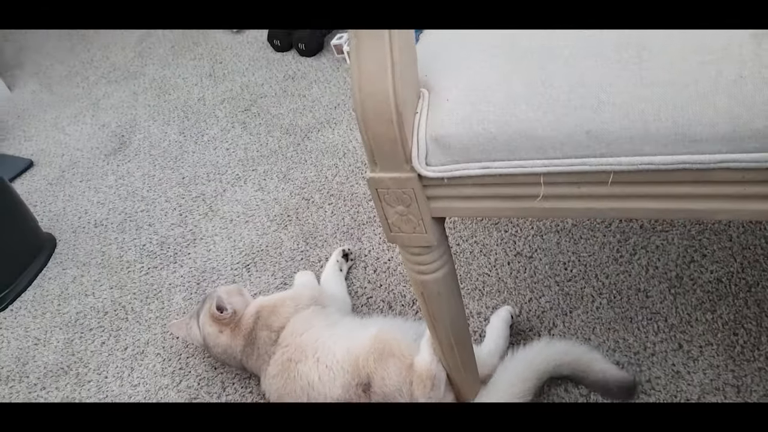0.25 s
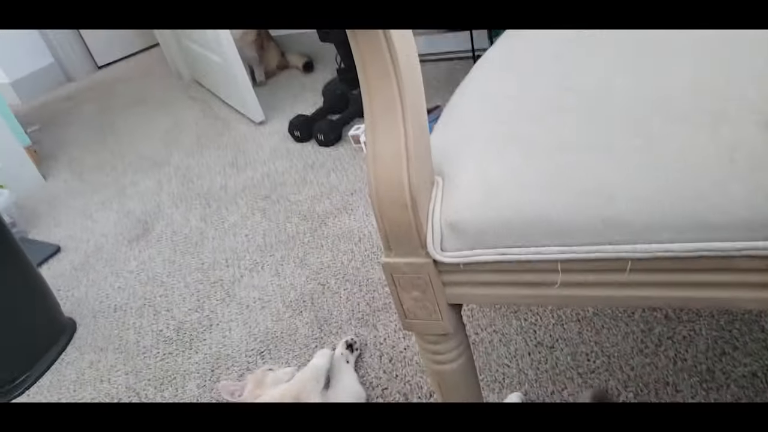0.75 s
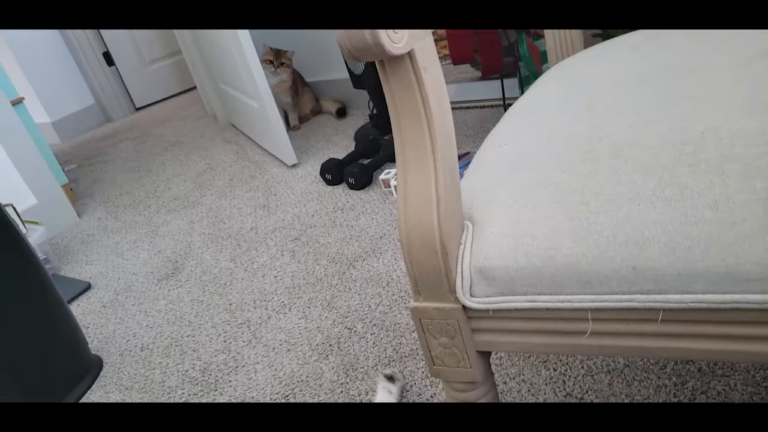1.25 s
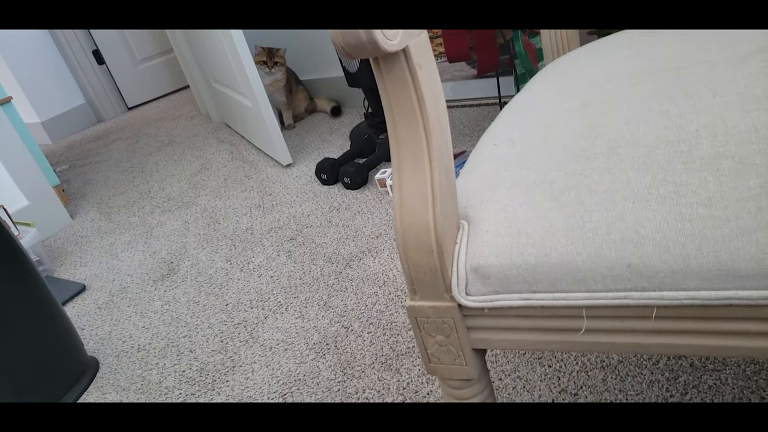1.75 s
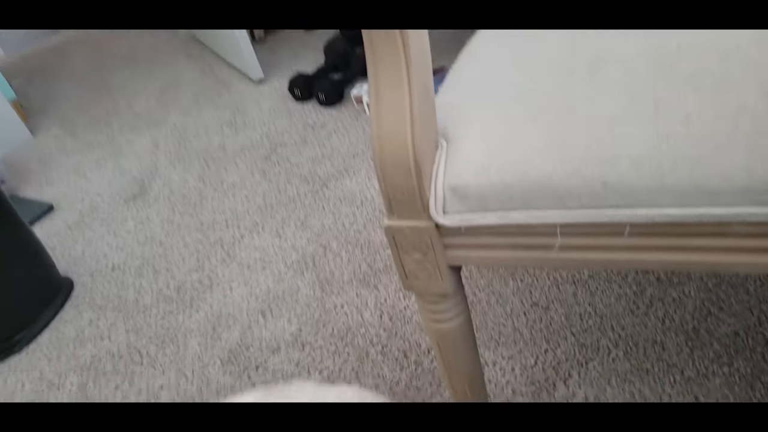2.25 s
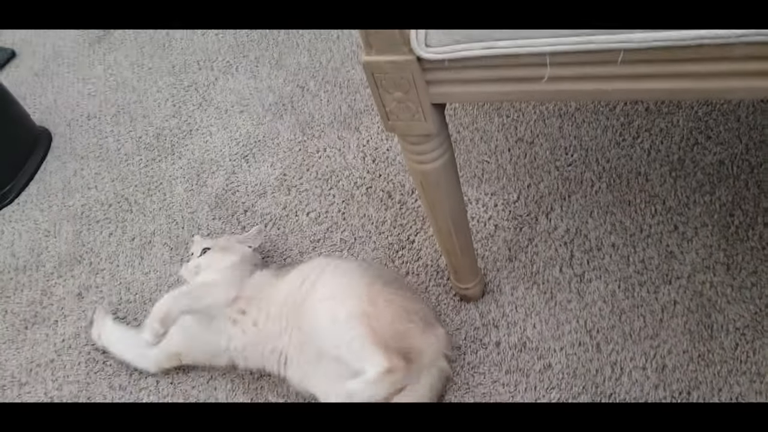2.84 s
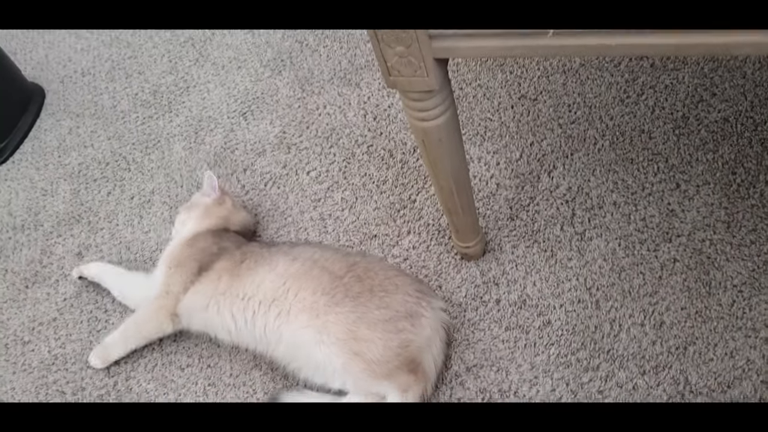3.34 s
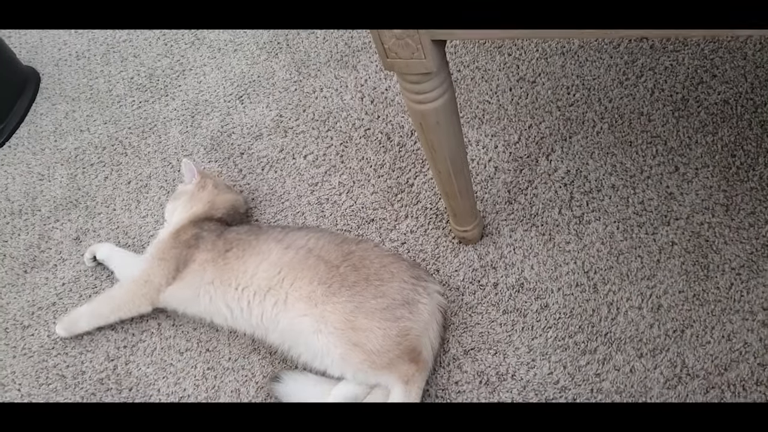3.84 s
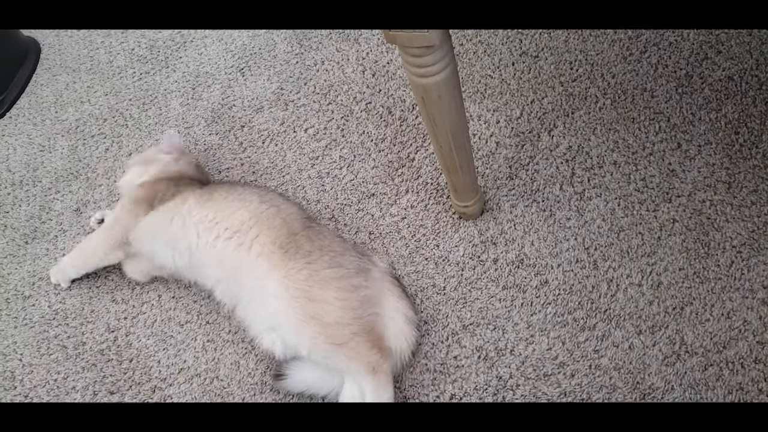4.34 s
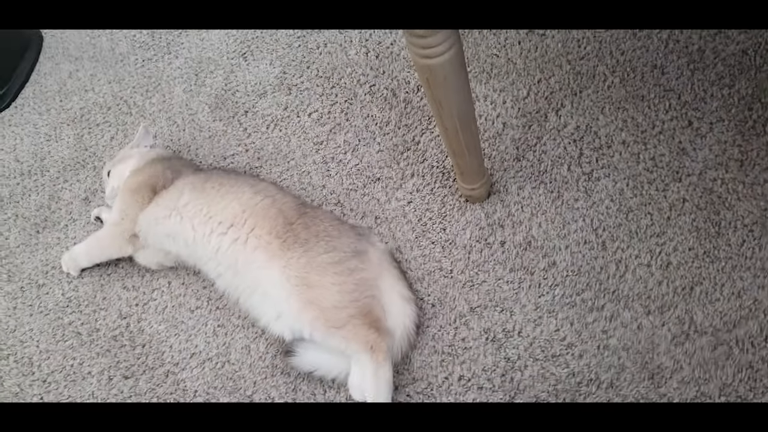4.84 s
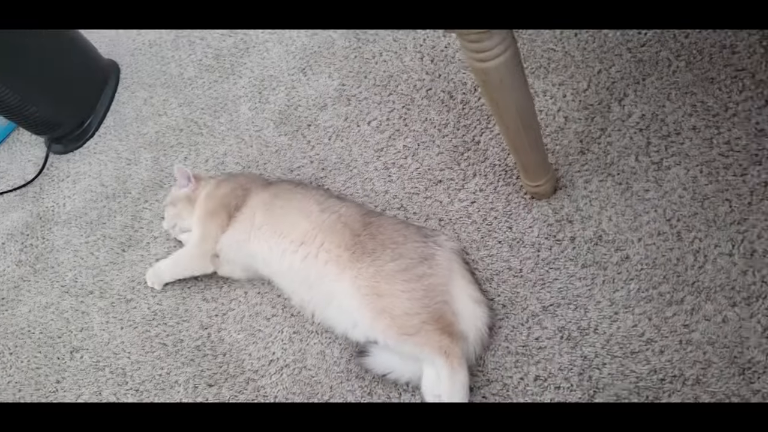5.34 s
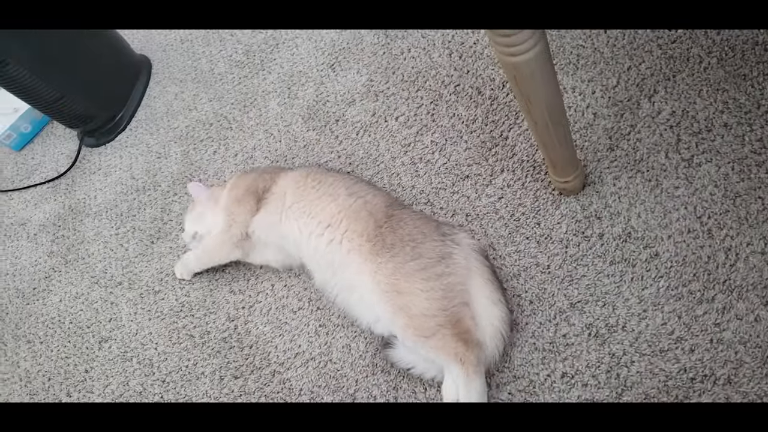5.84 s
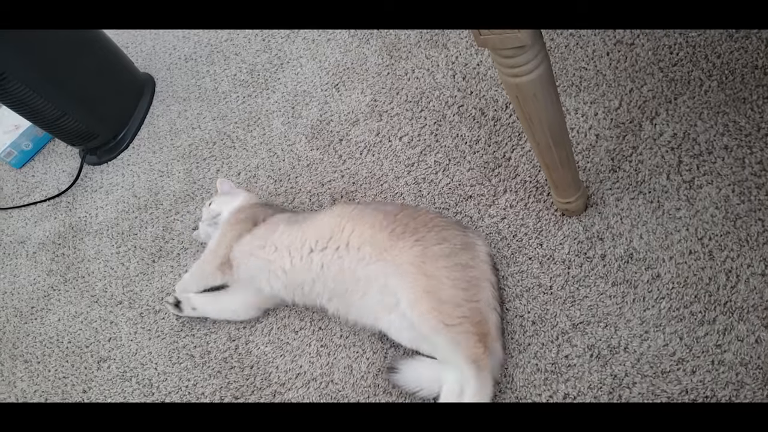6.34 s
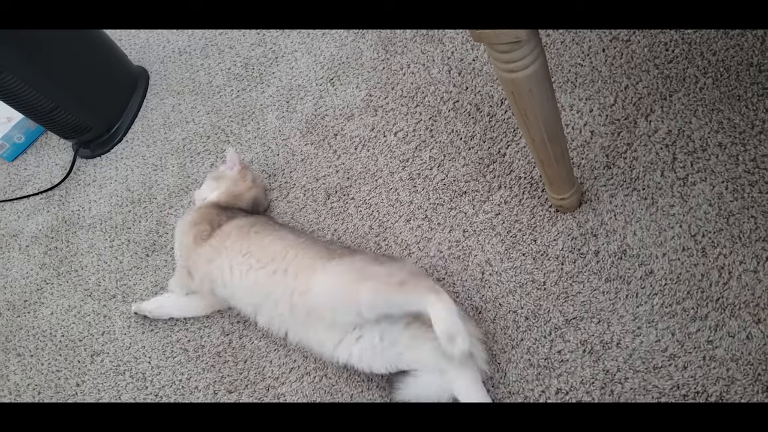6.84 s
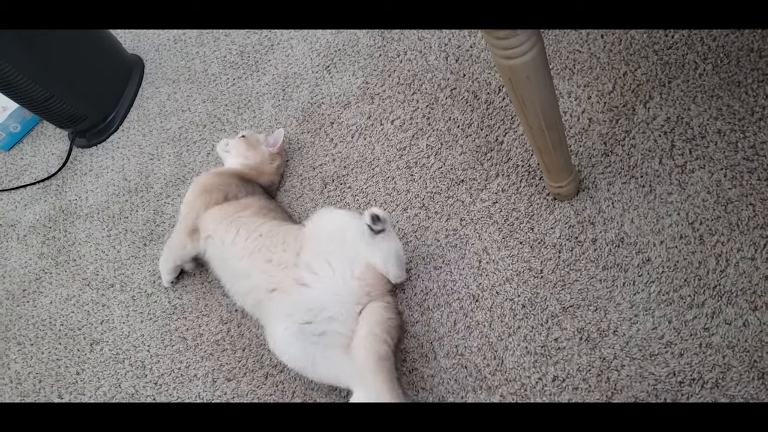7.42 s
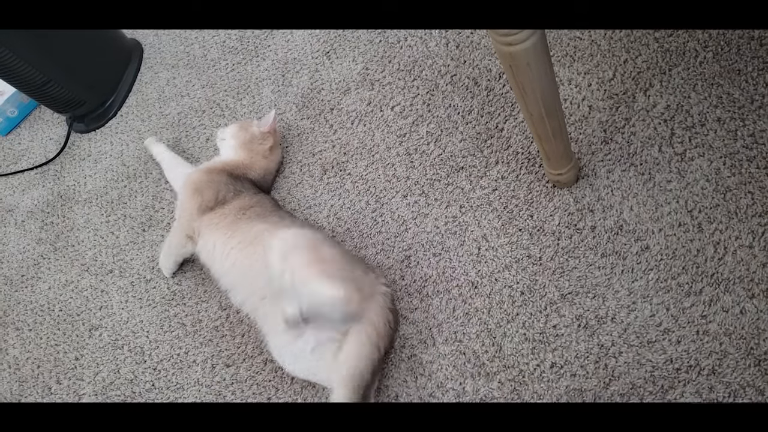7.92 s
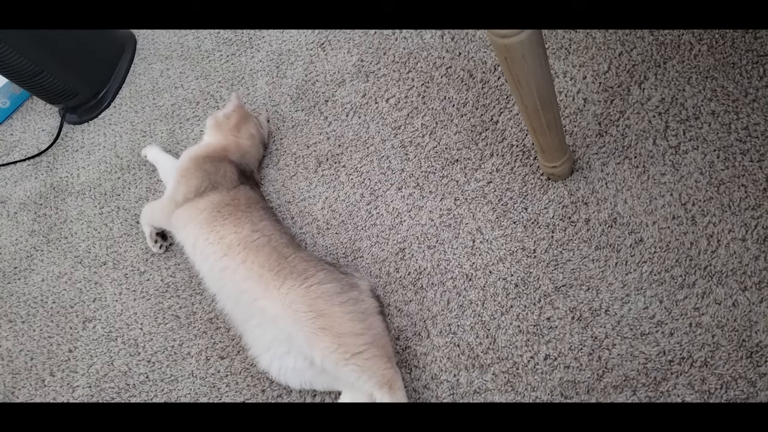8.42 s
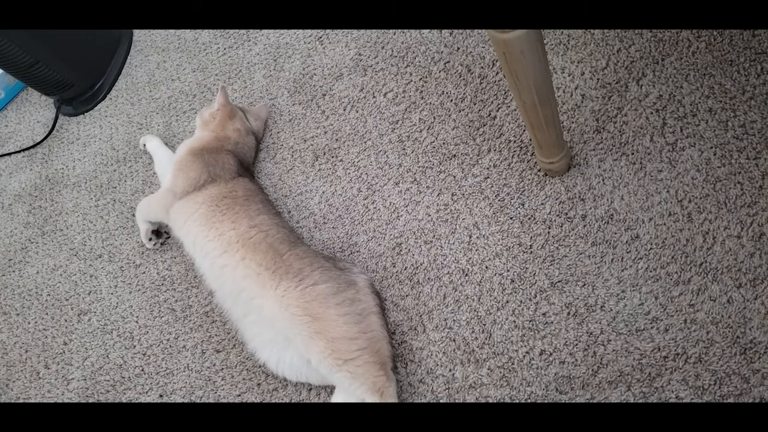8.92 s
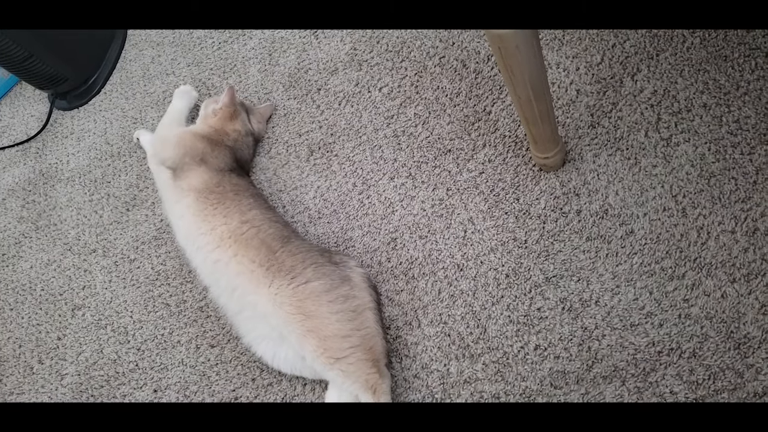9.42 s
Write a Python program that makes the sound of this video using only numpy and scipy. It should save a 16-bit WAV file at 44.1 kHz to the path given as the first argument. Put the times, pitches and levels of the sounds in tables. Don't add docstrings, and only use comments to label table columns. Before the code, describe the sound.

From 0 to 1.1 seconds, fingers shift on a hand-held stereo recorder: dense, very close hollow knocks, loudest around 0.2 to 0.35, with crisp ticks, short scrapes and low rumble. From 1.2 to 1.6 a cat gives faint, low closed-mouth coos amid light taps. Softer coos follow near 2.0 to 2.3, with more bumps. Between 2.5 and 2.85 handling thickens again, knocks and dry rubbing with a quick stuttering slip, overlapping a soft mew that rises until 3.05, then drops and fades by 3.3. Quiet, small pats and a tiny coo at 3.6. Brief nasal chirps at 4.2 lead to a hoarse fluttering trill from 4.5 to 5.1, with taps near its end. Faint pats and rubs come around 6.0 and 6.7, two firmer knocks around 7.5, light ticks until 8.2. Then low hum and gentle hiss, with one barely audible coo at 9.1. Close, slightly left-leaning, dry, small room.

```python
import sys
import numpy as np
from scipy import signal
from scipy.fft import rfft, irfft, next_fast_len
from scipy.io import wavfile
from scipy.ndimage import uniform_filter1d

SR = 44100
rng = np.random.default_rng(int(sys.argv[2]) if len(sys.argv) > 2 else 0)


def convert_level_to_amplitude(level_db):
    exponent = np.asarray(level_db, float) / 20
    return 10 ** exponent


def wrap_up_sound(samples):
    columns = np.atleast_2d(samples).T
    tamed = np.clip(columns, -1, 1)
    steps = np.round(tamed * 32767).astype(np.int16)
    wavfile.write(sys.argv[1], SR, steps)


N = 426888

# start_s, knock_db, tick_over_knock_db, sway_over_knock_db
FIRM_KNOCKS = [(0.017, -10.5, -17, -3), (0.0304, -7, -16.5, -16.5), (0.1915, -2.5, -9, -7),
               (0.2926, -2.5, -4, -4.5), (0.3075, -4.5, -5, -5.5), (0.3266, -3.5, -2, -11),
               (0.6086, -17, -2.5, 3.5), (0.664, -9.5, -1.5, 2.5), (0.7034, -6.5, -5.5, -36),
               (0.719, -12, -14, 1.5), (0.7544, -8, -2.5, 1), (0.9565, -11.5, 7.5, 2),
               (1.007, -19.5, -6, 10), (1.0743, -13.5, -8, 2.5), (2.152, -21.5, -6.5, 3),
               (2.1637, -24.5, -22, 18.5), (2.3142, -18.5, -12.5, -1.5), (2.3533, -15.5, -18, -7),
               (2.6301, -13.5, -7.5, -14), (2.6376, -20.5, -12, -4), (2.7896, -14.5, -19.5, -34),
               (2.8138, -10, -18.5, -36), (2.8268, -8.5, -17.5, -11.5), (4.72, -24, 6, -15),
               (4.8513, -19.5, -10.5, -5), (4.8855, -15, -6.5, 1.5), (5.025, -20, -2, -3),
               (6.6914, -17, -15.5, -11.5), (7.4572, -9.5, -5, -12.5), (7.538, -14.5, -13.5, -8.5)]
# start_s, tick_db
NAIL_TAPS = [(.128, -31.5), (.283, -28), (0.708, -28), (0.7992, -34), (0.851, -46), (4.848, -35),
             (1.111, -30), (1.1338, -36), (1.4942, -36.5), (1.5102, -36.5), (1.8797, -38.5), (2.1251, -29),
             (2.1866, -28), (0.976, -37), (2.5566, -33), (3.839, -50), (4.762, -38), (4.963, -44),
             (4.997, -38), (5.003, -27), (5.0911, -38), (6.1295, -37.5), (7.1431, -45), (7.158, -55),
             (7.487, -37), (7.74, -39.5), (7.9247, -45.5)]
# start_s, knock_db, knock_hz, sway_over_knock_db
FINGER_PATS = [(0.116, -30, 346, 1), (0.9825, -24.5, 310, 12), (1.094, -19.5, 253, -13),
               (1.125, -22.5, 330, 5), (1.486, -31.5, 220, 7), (2.17, -17.5, 158, 2.5),
               (2.261, -24.5, 322, -4), (2.269, -27, 323, 9), (2.349, -23, 390, -18), (2.4567, -31, 375, 5),
               (2.5277, -44, 520, 15), (2.5801, -21.5, 250, -2), (2.594, -28, 346, -8),
               (2.689, -27, 370, 1), (2.737, -27, 337, -4), (2.749, -31, 334, -14), (2.8024, -15, 575, -14),
               (3.079, -27.5, 480, -4), (3.4085, -21.5, 554, -17), (3.608, -31.5, 330, -1.5),
               (3.853, -45, 294, 10.5), (4.893, -20, 222, -8.5), (4.984, -17, 583, -11),
               (5.991, -34, 487, -9), (6.1, -34, 420, -6), (6.159, -41.5, 197, 6), (6.935, -47, 340, 2.5),
               (7.924, -35, 374, -10), (8.1974, -49.5, 494, -4), (6.107, -34.5, 170, 4),
               (6.129, -37, 270, -3), (.872, -37, 300, 3), (2.926, -41, 300, -5), (6.689, -28.5, 407, -10)]
# first_s, last_s, slips_per_s, knock_db
STICK_SLIPS = [
    (2.6447, 2.671, 160, -20.5),
    (3.619, 3.676, 113, -38),
    (6.018, 6.046, 45, -36),
]
# from_s, knock_hz, tick_hz, upper_mode_db, left_right_db
GRIPS = [(0, 428, 3050, -2, 8), (.1, 381.8, 3240, -11, 10.5), (.17, 412, 3360, -7, 7),
         (.25, 591, 3300, -4, 10), (.5, 297, 2180, -15, 4.5), (.65, 340, 2210, -32, 4),
         (.706, 457, 2290, 2, 5.5), (.73, 330, 2360, -31, 5.5), (.93, 349, 2350, -22, 1.5),
         (1.05, 332, 2420, -28, 3), (1.4, 294, 2600, -7, 8), (1.8, 294, 1480, -5, 0.5),
         (2.1, 420, 2500, -12, 5.5), (2.14, 402, 2400, -2, -0.5), (2.18, 393, 2390, -10.5, 14),
         (2.25, 387, 2090, -22, 7), (2.33, 426, 2740, -1.5, 4), (2.4, 430, 2370, -5, -16),
         (2.55, 414, 2320, -17, 11.5), (2.6, 476, 3250, -9.5, 13), (2.72, 342, 3240, -13, -14),
         (2.77, 507, 3020, 1.5, 3.5), (2.82, 530, 2920, -2, -1), (3, 576, 1936, -8, 13.5),
         (3.5, 570, 2010, -21.5, -14), (4.6, 572, 2570, -8, 12.5), (4.8, 445, 2040, -12, 13),
         (4.87, 478, 3000, -11, 6), (4.95, 469, 2210, -11, 11.5), (5.015, 463, 2690, -10, 12.5),
         (5.9, 398, 2030, -15.5, 5), (6.12, 335, 4480, -13.5, 5.5), (6.5, 435, 1920, -30, 11),
         (7.3, 408, 2010, -13.5, 11.5), (7.5, 386, 1950, -14, 14), (7.7, 383, 1287, -26, 10)]
# lower_mode_db, shrill_mode_db, tick_ms, tick_left_right_db, overtone_left_right_db
GRIP_TINTS = [(7, -2, 1.35, 6, -13), (4.5, -17, 0.65, 4.5, 13), (-1, -9, 1.4, 7, -8),
              (-2, -22.5, 1, 8.5, 3.5), (-17, -19, 1.2, 0, -7), (-8, -41, 1.17, -1, -11),
              (0, -14, 1.5, 8.5, -5), (5.5, -38, 1.2, 3.5, -19), (-10, -36, 0.96, 0.5, -8),
              (-5, -36, 1.35, 3, -5), (-13, -9, 0.77, 9, -2), (0, -28, 1.2, 11, -3), (2, -18, 2.1, 1, 7),
              (2, -10, 1.4, -1, -3), (-17, -27, 1.4, 10, -6), (-3, -30, 1.5, 1, -14), (-4, 2, 0.7, 8.5, 2),
              (-2, -12, 1.1, -13, 12), (-10, -28, 1, -7, -3), (-25, -14, 0.74, 18.5, 2.5),
              (-8, -25, 0.69, -6, -3), (-7, 3, 0.88, 8, 5), (-3, -6, 1.4, 6.5, 2),
              (-3.5, -25, 0.55, 8, -7.5), (-8, -30, 1.8, -12, -9.5), (-14, -6, 1.4, 9, 7),
              (-7, -18, 1.1, 8, -12), (0, -9, 0.96, 11.5, 8), (-12, -15, 0.98, 13, 3),
              (-1, -26, 0.62, 8, -18), (0.5, -25.5, 1.3, 8, -1), (-10.5, -25, 0.77, 14, -4),
              (-2.5, -33, 1.47, 11.5, -10), (-24.5, -34.5, 1.62, 7, -10), (-12, -34, 1.8, 20, -14),
              (-5, -31, 1.14, 6, 8)]
# from_s, direction, case_hz, case_over_knock_db, second_mode_db
PUSHES = [(0, 1, 208, -0.5, -4), (.17, 1, 240, -1.5, -8), (.25, 1, 191.7, 1, -15), (.5, -1, 271, -0.5, -14),
          (.9, -1, 273, 2.5, -20), (1.4, -1, 247, 1.5, -4), (2, -1, 227, -7.5, 0), (2.25, -1, 247, -11, 4),
          (2.4, -1, 238, -5, 0), (2.6, -1, 242, -9, -4), (2.77, 1, 256, -10, 1), (3, -1, 245, -37, 3),
          (4.8, -1, 236, -8, -1.5), (4.95, -1, 240, -10, -3.5), (5.9, 1, 264, -2.5, -10),
          (6.5, 1, 255, -9, 0), (7.3, 1, 272, -6.5, 1), (7.7, 1, 258, -0.5, -5.5)]
CASE_T60_S = [0.036, 0.019, 0.024, .034, 0.033, 0.042, 0.045, 0.052, 0.046, 0.037, 0.033, .03, 0.05, 0.041,
              0.045, 0.05, 0.058, 0.042]
# left_hz, right_hz
SHRILL_HZ = [6300, 9220]
# left_hz, right_hz
NODES_HZ = [1174, 896]
# start_s, length_s, level_db, brightness_db_per_octave above 1 kHz
RUBS = [(0.115, 0.062, -40, 2), (0.797, 0.025, -30, 2), (0.704, 0.041, -24, 0), (0.942, 0.13, -30.5, 3),
        (1.081, 0.095, -27.5, 0.5), (1.489, 0.11, -35, -14), (1.801, 0.11, -55, -12),
        (7.727, 0.095, -51, -2), (2.523, 0.036, -33, 2.5), (2.55, 0.13, -39, 0.5),
        (2.622, 0.15, -38.5, 2.5), (2.732, 0.19, -43.5, -1.5), (3.407, 0.11, -51, 0.5),
        (3.607, 0.1, -41, 0), (3.687, 0.051, -45.5, -3), (4.85, 0.046, -40, 3), (4.886, 0.1, -34, 2),
        (4.975, 0.12, -36.5, 2), (5.062, 0.12, -44.5, 2), (5.824, 0.096, -49, -34), (5.985, 0.11, -42, -15),
        (6.098, 0.075, -39, -23), (6.688, 0.09, -43.5, -1.5), (7.134, 0.11, -58, 6.5),
        (7.448, 0.066, -34.5, -14), (7.543, 0.072, -40, -0.5)]
# freq_hz, db_per_hz
RUB_COLOUR = [(88, -28), (150, 8), (710, -13.5), (981, -6), (1090, -21.5), (1280, -15.5), (5000, -38.5),
              (6500, -51.5), (8000, -52), (11500, -42), (16000, -56)]
# time_s, pitch_hz, level_db
MEW = [
    (2.75, 446.4, -41),
    (2.871, 484.3, -40.5),
    (2.94, 500.8, -38),
    (2.99, 511, -39),
    (3.015, 554, -37),
    (3.06, 555.5, -42.5),
    (3.091, 463, -36),
    (3.17, 466.5, -48),
    (3.27, 450, -68),
]
# time_s, pitch_hz, level_db
TRILL = [
    (4.49, 669, -43),
    (4.55, 557, -39),
    (4.66, 600, -33),
    (4.729, 506.6, -35),
    (4.79, 565.8, -38),
    (4.85, 629.5, -32.5),
    (4.93, 651.5, -32.5),
    (5.08, 653.4, -34),
    (5.11, 630, -57),
]
# start_s, length_s, level_db, first_hz, last_hz
COOS = [(1.185, 0.13, -35.5, 301, 238.5), (1.36, 0.15, -35, 239.2, 227), (1.485, 0.08, -32.5, 215, 311.4),
        (1.57, 0.05, -40.5, 325, 319), (.42, 0.1, -46, 187, 180), (1.7, 0.26, -49.5, 185, 188.7),
        (2.03, 0.276, -42.5, 380, 368), (2.2, 0.11, -35, 281, 275.6), (3.62, 0.098, -44, 215, 206),
        (4.325, 0.063, -54.5, 332, 319), (9.14, 0.16, -54, 171, 187.3)]
# start_s, length_s, level_db, first_hz, last_hz
CHIRPS = [
    (4.19, 0.05, -50, 575, 475),
    (4.235, 0.09, -44, 466, 442),
    (4.32, 0.06, -58, 550, 640),
    (2.27, 0.18, -46, 560, 515),
]
OPEN_DB = [3, -8.5, -17, -30]
CLOSED_DB, NASAL_DB = [0, -19, -31], [0, -27]
# freq_hz, t60_s
ROOM_T60 = [(100, 0.63), (500, 0.13), (1200, 0.25), (2500, 0.28), (5500, 0.13), (8000, 0.1), (14000, 0.3)]
# time_s, level_db
SHAKE = [(0.0, -39), (0.16, -36), (0.3, -35), (0.43, -43.5), (0.58, -47), (0.83, -38), (0.94, -39),
         (1.21, -49.5), (1.91, -45.5), (2.42, -42.5), (2.64, -32.5), (3.099, -51), (4.55, -54.5),
         (4.93, -40.5), (5.31, -54.5), (9.1, -59.5), (9.21, -49.5), (9.32, -61)]
# freq_hz, db_per_hz
SHAKE_COLOUR = [(15, -40), (25, -6), (70, 3), (108, 1.5), (152, -17.5), (314, -15), (458, -24.5),
                (500, -34.5), (650, -53), (1100, -120)]
# freq_hz, db_per_hz
HUSH_COLOUR = [(15, -27.5), (40, -3.5), (60, 3), (82, -12), (118, 4), (150, -17), (400, -23), (1600, -24),
               (2120, -22.5), (2600, -28.5), (6000, -35), (8000, -44), (11500, -31), (15600, -29),
               (16000, -71)]
# freq_hz, likeness
HUSH_LIKENESS = [(60, 1), (180, 1), (550, 0.2), (1650, -0.26), (4970, -0.098), (15000, -0.2)]
# freq_hz, left_right_db
HUSH_LEAN = [(60, -5), (200, 7), (900, 2.5), (2000, 7.5), (5500, 4), (8000, 1.5), (12000, -0.5)]


def evened(x):
    return x / np.sqrt(np.mean(x ** 2) + 1e-20)


def read(points, hz):
    f, value = np.transpose(points)
    return np.interp(np.log(hz + 1), np.log(f + 1), value)


def add(mix, s, sound):
    part = mix[..., max(round(s * SR), 0):][..., :sound.shape[-1]]
    part += sound[..., :part.shape[-1]]


def sides(pan_db):
    return convert_level_to_amplitude([[pan_db / 2], [-pan_db / 2]])


def band(x, low_hz, high_hz):
    return signal.lfilter(*signal.butter(2, [low_hz, high_hz], "band", fs=SR), x)


def noise(colour, same, patchy_db, size):
    frames, hz = 4 * N // size + 5, np.fft.rfftfreq(size, 1 / SR)
    a, b, c, d, patches = rng.standard_normal((frames, len(hz), 5)).T
    patches = uniform_filter1d(patches, size=8, axis=0)
    patches = evened(uniform_filter1d(patches, size=10, axis=1))
    like = np.clip(read(same, hz), -1, 1)[:, None]
    left = a + 1j * b
    right = like * left + np.sqrt(1 - like ** 2) * (c + 1j * d)
    z = np.array([left, right]) * convert_level_to_amplitude(read(colour, hz)[:, None] + patchy_db * patches)
    return evened(signal.istft(z, nperseg=size, noverlap=3 * size // 4)[1][:, :N])


def ring(t, hz, t60, rise, sweep, settle, turn):
    cycles = hz * (t + sweep * settle * (1 - np.exp(-t / settle)))
    swell = 1 - np.exp(-(t / rise) ** 2)
    wave = swell * convert_level_to_amplitude(-60 * t / t60) * np.sin(2 * np.pi * (cycles + turn))
    return wave / abs(wave).max()


def burst(t, hz, length, turn):
    bump = np.sin(np.pi * np.minimum(t / length, 1)) ** 1.1
    return bump * np.sin(2 * np.pi * (hz * t + turn))


def grip(s):
    k = np.searchsorted([row[0] for row in GRIPS], s) - 1
    return (*GRIPS[k], *GRIP_TINTS[k])


def contacts():
    pat_tick_db = -19.5
    rows = []
    for s, db, tick_db, sway_db in FIRM_KNOCKS:
        rows.append((s, db, grip(s)[1], db + tick_db, db + sway_db))
    for s, tick_db in NAIL_TAPS:
        rows.append((s, tick_db - 0.5, grip(s)[1], tick_db, tick_db + 2.5))
    for s, db, hz, sway_db in FINGER_PATS:
        tick_db = db + pat_tick_db + 7.5 * np.log2(hz / 400)
        rows.append((s, db, hz, tick_db, db + sway_db))
    for first, last, rate, db in STICK_SLIPS:
        for k, s in enumerate(np.arange(first, last, 1 / rate)):
            slip_db = db - 0.43 * k
            rows.append((s, slip_db, grip(s)[1], slip_db + pat_tick_db, slip_db - 14))
    return rows


def contact_tick(port, held, chance):
    t = np.arange(100) / SR
    a, b, c, d = chance
    _, _, tick_hz, upper_db, _, lower_db, shrill_db, tick_ms, _, _ = held
    upper_hz = max(1.4 * tick_hz, 4300) - 300 * port + 500 * d
    tick = burst(t, tick_hz * (.96 + .08 * c), tick_ms / 1000, a + .25 * port)
    tick += convert_level_to_amplitude(shrill_db - 3 + 1.5 * port) * burst(t, SHRILL_HZ[port], 0.00059, a + 0.22 * port)
    tick += convert_level_to_amplitude(upper_db) * burst(t, upper_hz, 0.00055, b + 0.27 * port)
    tick += convert_level_to_amplitude(upper_db - 9.5 + 6 * port) * burst(t, 11500, 0.00036, c + 0.19 * port)
    tick += convert_level_to_amplitude(lower_db - 1.2 * port) * burst(t, 1740, 0.0014, d + 0.44 * port)
    return tick


def knock_body(port, hz, overtone_pan_db, turn):
    t = np.arange(1000) / SR
    body = ring(t, hz * 0.96, 0.0054, 0.00055, 0.93, 0.00037, .5 + 0.2 * port)
    overtone = ring(t, hz * 1.772, 0.013, 0.0012, 0.24, 0.0066, turn)
    return body + 0.3 * sides(overtone_pan_db)[port] * overtone


def case_modes(t, port, hz, second_db, t60_s, over, chance):
    _, b, c, d = chance
    first_hz = hz * (1 - .2 * port + .08 * (d - .5))
    second_hz = 1.55 * hz * (1 + .1 * (c - .5))
    turn = [.42, .18][port] + over * (1 + port) / 2
    case = ring(t, first_hz, t60_s, 0.0027, 0.35, 0.0017, turn)
    case += convert_level_to_amplitude(second_db) * ring(t, second_hz, 0.026, 0.0015, 0.098, 0.00069, b + 0.18 * port)
    return convert_level_to_amplitude(-6.5 * port) * case


def case_sway(t, port, push, over, chance):
    hz, t60_s = [111.2, 57.7], [0.02, 0.14]
    drift = .97 + .06 * chance[1]
    if port == 1:
        rise_s = .004 * (1 + 1.2 * (push > 0))
        return ring(t, hz[1] * drift, t60_s[1], rise_s, 5.7, .004, .01 + .88 * over)
    sway = ring(t, hz[0] * drift, t60_s[0], .0072, .74, .0053, .11)
    return sway + convert_level_to_amplitude(-10) * ring(t, hz[1] * drift, t60_s[1], .0072, .74, .0053, .21 + over)


def knocks():
    out, t = np.zeros((2, N)), np.arange(3300) / SR
    for s, db, hz, tick_db, sway_db in contacts():
        chance, held = rng.random(4), grip(s)
        pan_db, tick_pan_db, overtone_pan_db = held[4], held[8], held[9]
        k = np.searchsorted([row[0] for row in PUSHES], s) - 1
        _, push, case_hz, case_db, second_db = PUSHES[k]
        over = (1 - np.sign(push)) / 4
        for port in range(2):
            tick = contact_tick(port, held, chance)
            blow = convert_level_to_amplitude(case_db) * case_modes(t, port, case_hz, second_db, CASE_T60_S[k], over, chance)
            add(blow, 0, knock_body(port, hz, overtone_pan_db, chance[0]))
            blow = convert_level_to_amplitude(db) * blow * sides(pan_db)[port]
            sway = convert_level_to_amplitude(sway_db) * case_sway(t, port, push, over, chance) * sides(-1)[port]
            add(out[port], s - .0006, convert_level_to_amplitude(tick_db - 2.0) * tick * sides(tick_pan_db)[port])
            add(out[port], s - .0006, blow + sway)
    out = out - 0.58 * signal.lfilter(*signal.iirpeak(7600, 4.5, SR), out)
    return np.array([signal.lfilter(*signal.iirnotch(hz, 3.5, SR), x) for hz, x in zip(NODES_HZ, out)])


def rubs():
    strength_db = 3 * np.minimum(rng.exponential(1, N), 2.5)
    jerks = convert_level_to_amplitude(strength_db) * (rng.random(N) < 300 / SR)
    clumps = 1.7 + evened(signal.oaconvolve(jerks, np.hanning(160))[:N])
    scrape = evened(clumps * noise(RUB_COLOUR, [(100, 0.2), (9000, 0.056)], 1.7, size=256))
    out = np.zeros((2, N))
    for s, length, db, bright_db in RUBS:
        part = scrape[:, round(s * SR):round((s + length) * SR)]
        size = part.shape[1]
        hz, u = np.fft.rfftfreq(size, 1 / SR), np.linspace(0, 1, size)
        tilt = convert_level_to_amplitude(bright_db * np.log2(np.clip(hz / 1000, 1, 6)))
        part = irfft(rfft(part) * tilt, size)
        level = convert_level_to_amplitude(db - 25.5 * u ** 2.66) * signal.windows.tukey(size, .4)
        add(out, s, level * part * sides(grip(s)[4]))
    return out


def wander(size, width):
    x = uniform_filter1d(rng.standard_normal(size), size=width)
    return evened(uniform_filter1d(x, size=width))


def call(rows, overtones_db, trill_hz):
    s, *columns = np.transpose(rows)
    t = np.arange(s[0], s[-1], 1 / SR)
    hz, db, depth = (np.interp(t, s, c) for c in columns)
    slow, quick = wander(len(t), 600), wander(len(t), 70)
    flutter = np.sin(2 * np.pi * np.cumsum(trill_hz * (1 + 0.43 * slow)) / SR)
    depth = np.clip(depth, 0, 1)
    pitch_hz = hz * (1 + 0.014 * slow + 0.013 * quick + 0.075 * depth * flutter)
    turns = np.cumsum(pitch_hz) / SR
    voice = np.zeros(len(t))
    for k, overtone_db in enumerate(overtones_db):
        dull_db = .5 * k * (db - db.max())
        voice += convert_level_to_amplitude(overtone_db + dull_db) * np.sin(2 * np.pi * (k + 1) * turns)
    level = np.sqrt(2) * convert_level_to_amplitude(db + 1.35 * quick) * (1 + 0.31 * depth * flutter)
    rasp = np.sin(2 * np.pi * np.cumsum(72 * (1 + 0.23 * slow)) / SR)
    level *= 1 + 1.2 * depth ** 2 * rasp
    return s[0], level * voice * signal.windows.tukey(len(t), .1)


def glide(start, length, db, first_hz, last_hz):
    u = np.linspace(0, 1, num=9)
    hz = first_hz + (last_hz - first_hz) * (1 - (1 - u) ** 1.52)
    level_db = db - 7 * (2 * u - 1) ** 2
    return np.transpose([start + length * u, hz, level_db, .14 + 0 * u])


def cat():
    out = np.zeros(N)
    add(out, *call([(*row, 0.4) for row in MEW], OPEN_DB, 29.97))
    trill = [(s, hz, db, 0.0056 * (680 - hz)) for s, hz, db in TRILL]
    add(out, *call(trill, NASAL_DB, 26.9))
    for rows, overtones_db, trill_hz in [(COOS, CLOSED_DB, 24), (CHIRPS, NASAL_DB, 27)]:
        for row in rows:
            add(out, *call(glide(*row), overtones_db, trill_hz))
    return out


def snaps():
    out = np.zeros(N)
    for s, db, _, tick_db, _ in contacts():
        out[round(s * SR)] += convert_level_to_amplitude(tick_db - 20.5) + convert_level_to_amplitude(db - 9.0)
    return convert_level_to_amplitude(8.5) * band(out, 350, 1300) + band(out, 300, 5500) + convert_level_to_amplitude(-10.5) * band(out, 9800, 15000)


def room(x):
    taps = np.zeros((2, SR // 2))
    at = np.arange(200, SR // 2 - 20, 20) + rng.integers(0, 20, (2, (SR // 2 - 201) // 20))
    np.put_along_axis(taps, at, rng.choice([-1., 1.], at.shape), 1)
    hz, t, z = signal.stft(taps, SR, nperseg=256)
    tail = signal.istft(z * convert_level_to_amplitude(-60 * t / read(ROOM_T60, hz)[:, None]), SR, nperseg=256)[1]
    t = np.arange(tail.shape[1]) / SR
    tail = tail * (0.33 + 1 - np.exp(-(t / 0.0253) ** 2))
    return signal.fftconvolve(x[None], tail / np.linalg.norm(tail[0]), axes=1)[:, :N]


def shake():
    s, db = np.transpose(SHAKE)
    level = convert_level_to_amplitude(np.interp(np.arange(N) / SR, s, db))
    return level * noise(SHAKE_COLOUR, [(30, 1.0), (500, 0.94)], 3.5, size=1024)


def hush():
    size = next_fast_len(N, True)
    lean_db = read(HUSH_LEAN, np.fft.rfftfreq(size, 1 / SR))
    z = rfft(noise(HUSH_COLOUR, HUSH_LIKENESS, 1.0, size=2048), size)
    z = z * convert_level_to_amplitude([lean_db / 2, -lean_db / 2])
    return convert_level_to_amplitude(-55) * irfft(z, size)[:, :N]


def scene():
    voice = cat()
    echoes = room(convert_level_to_amplitude(-11.0) * voice + convert_level_to_amplitude(2.5) * snaps())
    return convert_level_to_amplitude(-9.5) * voice * sides(2.1) + echoes + knocks() + rubs() + shake() + hush()


def roll_off(x):
    return signal.sosfilt(signal.butter(12, 16650, fs=SR, output="sos"), x)


def record(dry):
    heard = signal.lfilter(*signal.butter(2, 38.2, "high", fs=SR), dry)
    heard = np.clip(heard, -1, 1)
    edge = signal.firwin(255, 16500, window=("kaiser", 9), fs=SR)
    mix = signal.oaconvolve(heard, edge[None], "same")
    return roll_off(mix)


dry = scene()
out = record(dry)
wrap_up_sound(out)
```